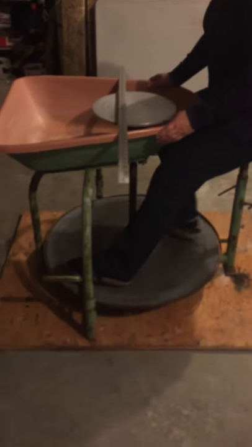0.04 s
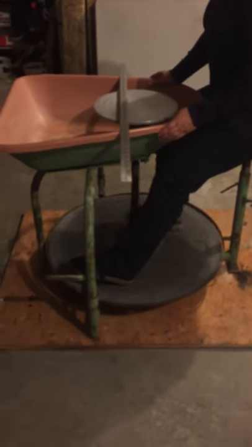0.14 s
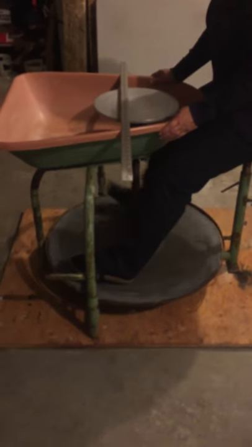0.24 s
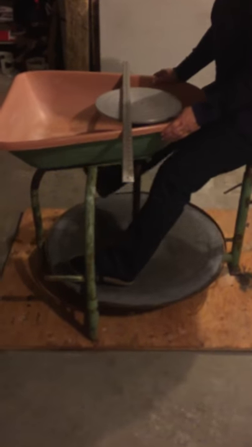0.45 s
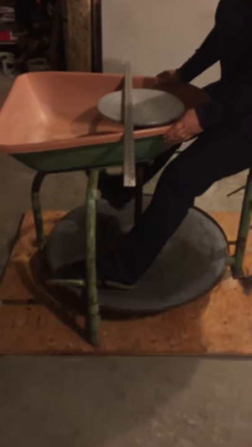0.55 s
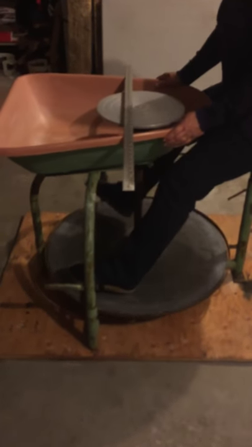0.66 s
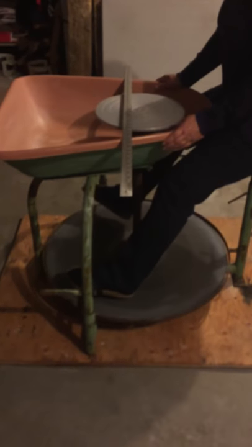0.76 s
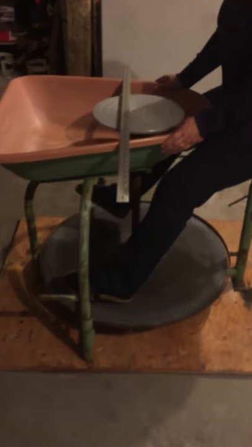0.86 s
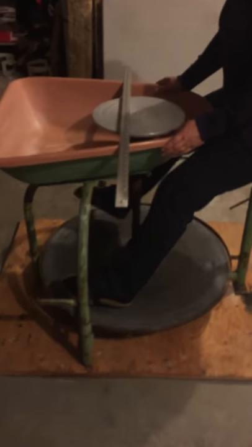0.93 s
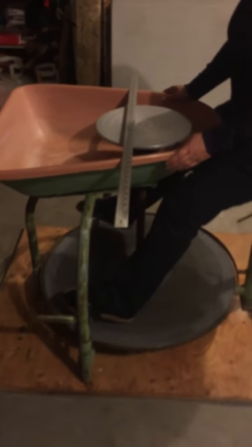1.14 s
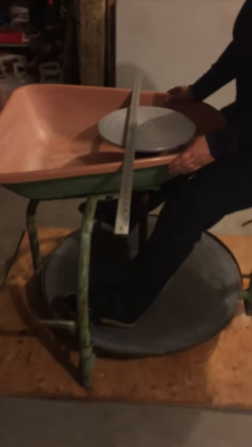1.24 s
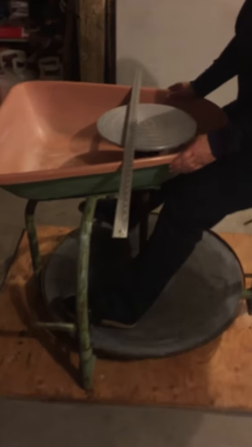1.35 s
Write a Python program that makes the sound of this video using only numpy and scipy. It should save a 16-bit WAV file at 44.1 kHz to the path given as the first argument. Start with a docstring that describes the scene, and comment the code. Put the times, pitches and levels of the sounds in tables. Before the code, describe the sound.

A foot kicks a potter's wheel with a scuff and a low, rattling thud.

```python
"""In a quiet workshop, a foot kicks the flywheel of a home-made potter's wheel.
The trouser leg swishes and the sole scrapes over the disc, both by friction. The foot lands with a
stuttering thud: a run of impacts that excites the modes of the frame and its tray and shakes loose parts.
The wheel rolls on with a faint rumble, a soft knock and a small rattling click.
The room answers the contacts with a short, dull reverberation."""
import sys
import numpy as np
from scipy import signal
from scipy.fft import rfft, irfft
from scipy.io import wavfile

SR = 44100
rng = np.random.default_rng(int(sys.argv[2]) if len(sys.argv) > 2 else 0)


def int16_out(signal):
    """Quantize to a 16-bit WAV file."""
    q = np.round(np.clip(np.atleast_2d(signal).T, -1, 1) * 32767)
    wavfile.write(sys.argv[1], SR, q.astype(np.int16))


N = 61739
TIME = np.arange(N) / SR
BIN_HZ = np.arange(N // 2 + 1) * SR / N
SHAKE_START_S, SHAKE_ATTACK_S, SHAKE_HOLD_S = 0.4265, 0.021, 0.026

# Pressure of the sliding sole. Each row: time in seconds, level in dB.
SOLE_PRESSURE = [(0.21, -79), (0.216, -52), (0.226, -44.5), (0.235, -36.5), (0.275, -39), (0.295, -42),
                 (0.311, -43), (0.33, -46.5), (0.374, -49.5), (0.388, -44), (0.42, -51.5), (0.44, -57),
                 (0.5, -96)]
# Modes of the wheel's steel parts. Each row: frequency in Hz, gain in dB, T60 in seconds.
STEEL_MODES = [(1037, 1, 0.24), (1165, -5, .2), (1781, 1, 0.68), (2222, 4, 0.21), (2380, -2, 0.073),
               (2488, -0.5, 0.11), (2779, 2, 0.29), (3086, -2, 0.13)]


def from_db(db):
    """Amplitude ratio of a level in decibels."""
    return 10 ** (np.asarray(db) / 20)


def unit_rms(x):
    """Normalisation to an RMS of one."""
    return x / np.sqrt(np.mean(x ** 2) + 1e-20)


def envelopes(rows):
    """Interpolation in dB over time: one gain curve for each level column."""
    times, *columns = np.transpose(rows)
    return [from_db(np.interp(TIME, times, levels)) for levels in columns]


def at_hz(points, hz):
    """Interpolation on a logarithmic frequency axis."""
    frequencies, values = np.transpose(points)
    return np.interp(np.log(np.maximum(hz, 1)), np.log(frequencies), values)


def colour(x, spectrum):
    """Spectral shaping by (Hz, dB) points, at unit RMS."""
    return unit_rms(irfft(rfft(x) * from_db(at_hz(spectrum, BIN_HZ)), N))


def noise(spectrum):
    """Stationary Gaussian noise with the given spectral shape."""
    return colour(rng.standard_normal(N), spectrum)


def butter(x, hz, kind="low"):
    """Causal Butterworth filtering with gentle slopes."""
    sections = signal.butter(2, np.clip(hz, 10, SR / 2 - 500), kind, fs=SR, output="sos")
    return signal.sosfilt(sections, x + 1e-18)


def decay(start, t60):
    """Exponential decay: 60 dB in t60 seconds."""
    return (TIME >= start) * from_db(-60 * np.maximum(TIME - start, 0) / t60)


def swell(peak_s, width_s):
    """Gaussian rise and fall."""
    return np.exp(-.5 * ((TIME - peak_s) / width_s) ** 2)


def grains(per_second=3000, spread_db=2):
    """A Poisson process of tiny slips of uneven size."""
    sizes = from_db(spread_db * np.minimum(rng.exponential(1, N), 4)) * rng.choice([-1, 1], N)
    return sizes * (rng.random(N) < per_second / SR)


def impulses(rows):
    """Ideal impacts, one for each (seconds, dB) row."""
    out = np.zeros(N)
    for start, db in rows:
        out[int(start * SR)] += from_db(db)
    return out


def ring(force, modes):
    """Modal superposition: each (Hz, dB, T60 in seconds) mode is a driven, damped oscillator."""
    out = 0
    for hz, db, t60 in modes:
        radius, angle = from_db(-60 / (t60 * SR)), 2 * np.pi * hz / SR
        feedback = [1, -2 * radius * np.cos(angle), radius * radius]
        out = out + from_db(db) * signal.lfilter([0, np.sin(angle)], feedback, force + 1e-18)
    return out


def frame(force, radiation_hz=108):
    """Radiation efficiency: the frame and tray resonate, but give off little deep bass."""
    # Modes of frame and tray. Each row: frequency in Hz, gain in dB, T60 in seconds.
    frame_modes = [(133, -15.5, 0.067), (178.2, -16.5, 0.31), (224.3, -17.5, 0.15), (279.2, -19.5, 0.41),
                   (323.5, -0.5, 0.17), (337.4, -21, 1.27), (365.1, -12.5, 0.26), (420, -27, 0.092),
                   (475.5, -23, 0.28), (605, -21.5, .28), (660.6, -23, 0.46), (738.5, -29, 0.74),
                   (778, -37, 0.8), (844, -24, 0.69)]
    return butter(ring(force, frame_modes), radiation_hz, "high")


def room_tone():
    """The noise floor: steady low-pitched noise and a faint white hiss."""
    low = noise([(25, -26), (55, 3.5), (130, 5.5), (300, -5.5), (1000, -19), (8000, -49)])
    return from_db(-73.5) * low + from_db(-78) * rng.standard_normal(N)


def reverberation(x, cutoff_hz=2400):
    """A diffuse field: convolution with a dull, exponentially decaying noise."""
    tail = butter(rng.standard_normal(N), cutoff_hz) * decay(start=0.0091, t60=0.55)
    tail = tail / np.sqrt(np.sum(tail ** 2) * SR / 2 / cutoff_hz)  # about unit gain in the passband
    return from_db(-12) * signal.fftconvolve(x, tail)[:N]


def wheel():
    """Forced vibration: rolling rumbles and stirs the frame; shaft friction makes the steel sing."""
    # Rolling and rubbing. Each row: time in seconds, rumble level in dB, rub level in dB.
    roll_levels = [(0, -69, -71), (0.2, -80, -69.5), (0.6, -67, -72.5), (0.78, -66.5, -70.5),
                   (0.87, -61.5, -68.5), (1.0, -66.5, -65.5), (1.06, -67, -65), (1.095, -57.5, -66.5),
                   (1.13, -68.5, -64.5), (1.2, -62.5, -71), (1.3, -69.5, -73), (1.4, -64.5, -78)]
    # Spectra of the rolling wheel and its shaft. Each row: frequency in Hz, relative level in dB.
    rumble_spectrum = [(25, -24.5), (55, 0), (80, -18), (120, -1), (180, -3), (300, 1), (500, -13),
                       (780, -5.5), (1100, -39), (3000, -46)]
    rub_spectrum = [(400, 0), (1000, 5.5), (1900, 5.5), (3000, 0), (6000, -7.5), (9000, -12), (15000, -25)]
    # Swells of frame hum. Each row: peak time and width in seconds, frequency in Hz, level in dB.
    hum_swells = [(0.862, 0.017, 176.7, -53.5), (1.12, 0.06, 113.2, -63.5), (1.21, 0.032, 174.8, -62.5),
                  (1.22, 0.14, 742, -71)]
    rumble, rub = envelopes(roll_levels)
    hum = sum(from_db(db) * swell(peak, width) * np.sin(2 * np.pi * hz * TIME)
              for peak, width, hz, db in hum_swells)
    rolling_force = butter(rng.standard_normal(N), 700, "high")
    stirred = from_db(-8.5) * unit_rms(frame(rolling_force))
    singing = from_db(-9.5) * unit_rms(ring(rng.standard_normal(N), STEEL_MODES))
    return rumble * (noise(rumble_spectrum) + stirred) + rub * (noise(rub_spectrum) + singing) + hum


def scuff():
    """Brief friction in a narrow band: something brushes the turning wheel."""
    rasp = unit_rms(butter(grains(), [1590, 2170], "band"))
    return from_db(-64) * swell(peak_s=1.129, width_s=0.016) * rasp


def clicks():
    """A loose part rattles: its noise bursts add in power, and two of its modes ping."""
    # Impacts of the part. Each row: start in seconds, level in dB.
    ticks = [(1.3617, -47), (1.37, -58), (1.377, -53.5), (1.387, -54.5)]
    # Spectrum of the bursts. Each row: frequency in Hz, relative level in dB.
    tick_spectrum = [(300, -32), (750, 5.5), (1300, -7), (2200, 0.5), (2800, 2), (4100, -1), (5000, -21),
                     (15000, -40)]
    power = 0
    for start, db in ticks:
        burst = decay(start, t60=0.0072) + from_db(-5) * decay(start, t60=0.28)
        power = power + (from_db(db) * burst) ** 2
    ping = ring(impulses(ticks), modes=[(2730, 1, 0.069), (3420, -7, .05)])
    return .5 * np.sqrt(power) * noise(tick_spectrum) + from_db(-9) * ping


def knocks(cycles=3.36):
    """Heavy damping: each knock dies in a few cycles, leaving a clatter and a ring in the frame."""
    # Light knocks on the wheel. Each row: start in seconds, impulse level in dB, pitch in Hz.
    light_hits = [(0.2129, -26.5, 825), (1.0394, -39.5, 293)]
    # Spectrum of the clatter. Each row: frequency in Hz, relative level in dB.
    clatter_spectrum = [(60, -20.5), (130, -7), (400, 4), (700, -16), (1000, 2), (1400, -16), (2200, -8),
                        (4000, -22), (12000, -51)]
    out = 0
    for start, db, hz in light_hits:
        force = butter(impulses([(start, db)]), 3 * hz)
        clatter = from_db(db - 15) * noise(clatter_spectrum) * decay(start, t60=0.23)
        knock = ring(force, [(hz, 3, cycles / hz)]) + clatter + from_db(-17) * frame(force)
        out = out + butter(knock, 0.42 * hz, "high")
    return out


def trouser_leg():
    """Friction noise of cloth on cloth, in two bands that rise and fall separately."""
    # Swing of the leg. Each row: time in seconds, swish level in dB, top octave level in dB.
    cloth_levels = [(0, -85, -88), (0.05, -59, -64.5), (0.088, -71, -72), (0.124, -68.5, -73),
                    (0.17, -51.5, -58.5), (0.21, -48, -55.5), (0.26, -51.5, -65), (0.32, -56.5, -54),
                    (0.365, -62.5, -57), (0.42, -67, -71.5), (0.5, -78, -78), (0.6, -76, -87)]
    # Spectra of the swish and its top octave. Each row: frequency in Hz, relative level in dB.
    swish_spectrum = [(300, -12), (1200, -4), (2200, 2), (3500, 3), (5500, 4), (9000, -5), (15000, -25)]
    top_spectrum = [(3000, -25), (6500, -3), (9000, -2), (15000, -9.5)]
    swish, top = envelopes(cloth_levels)
    return swish * noise(swish_spectrum) + top * noise(top_spectrum)


def steel():
    """Resonance: grit under the sole and the chatter of loose parts excite the steel's modes."""
    slips = grains()
    pressure, = envelopes(SOLE_PRESSURE)
    shaking = swell(SHAKE_START_S + SHAKE_ATTACK_S, SHAKE_HOLD_S)
    strength = from_db(-13) * pressure + from_db(-50.5) * shaking
    return ring(slips * strength, STEEL_MODES) / np.std(ring(slips, STEEL_MODES))


def loose_parts():
    """Frequency-dependent damping: parts chatter with the thud, and the high treble dies first."""
    # Spectrum of the chatter. Each row: frequency in Hz, relative level in dB.
    chatter_spectrum = [(70, -13), (180, 7), (450, 11.5), (800, 5.5), (1300, -2), (2000, 1.5), (2900, -6.5),
                        (4500, -16.5), (6500, -24.5), (10000, -37), (15000, -49)]
    # Decay of the chatter. Each row: frequency in Hz, T60 in seconds.
    decay_times = [(100, 0.3), (400, 0.24), (900, 0.46), (2500, 0.29), (5000, 0.24), (12000, 0.14)]
    edges_hz = 70 * 2 ** np.arange(0, 8.1, .5)  # half-octave bands
    chatter_bins = rfft(colour(grains(), chatter_spectrum))
    attack = np.clip((TIME - SHAKE_START_S) / SHAKE_ATTACK_S, 0, 1)
    age = np.maximum(TIME - SHAKE_START_S - SHAKE_ATTACK_S - SHAKE_HOLD_S, 0)
    out = 0
    for low, high in zip(edges_hz, edges_hz[1:]):
        band = irfft(chatter_bins * ((BIN_HZ >= low) & (BIN_HZ < high)), N)
        t60 = at_hz(decay_times, np.sqrt(low * high))
        out = out + band * from_db(-60 * age / t60)
    return from_db(-39.5) * out * attack


def scrape(sway_s=.297, sway_hz=47.5):
    """Sliding friction: grit under the sole rasps and drives the frame; the push sways the floor."""
    # Spectrum of the rasp. Each row: frequency in Hz, relative level in dB.
    rasp_spectrum = [(100, -28), (200, -7), (300, 10.5), (700, 7.5), (1400, 3.5), (2400, 1.5), (4000, -6),
                     (7000, -29), (15000, -28.5)]
    pressure, = envelopes(SOLE_PRESSURE)
    slips = grains()
    drag = butter(slips, 230, "high")
    ringing = frame(drag * pressure) / np.std(frame(drag))
    sway = np.sin(2 * np.pi * sway_hz * (TIME - sway_s)) * swell(sway_s, width_s=0.027)
    return pressure * colour(slips, rasp_spectrum) + from_db(2) * ringing + from_db(-50.5) * sway


def grip():
    """Slip turns to stick: grit crunches and the sole chirps as it stops sliding."""
    # Spectrum of the crunching grit. Each row: frequency in Hz, relative level in dB.
    crunch_spectrum = [(500, -14), (2500, 3.5), (4500, -2), (6000, -13.5), (15000, -26)]
    chirp_band = unit_rms(butter(rng.standard_normal(N), [7750, 8490], "band"))
    chirp = chirp_band * swell(peak_s=.463, width_s=0.0036)
    crunch = colour(grains(), crunch_spectrum) * decay(start=.429, t60=0.094)
    return from_db(-57.5) * chirp + from_db(-45.5) * crunch


def waver(start, onset_s=0.27, rate_hz=44.5, depth_db=2.5):
    """Random amplitude modulation: a gain whose flutter grows from the start time."""
    flutter = noise([(5, -10), (rate_hz, 0), (3 * rate_hz, -30), (20 * rate_hz, -90)])
    return from_db(depth_db * flutter * np.clip((TIME - start) / onset_s, 0, 1))


def thud():
    """Soft impact: band-limited pulses from the sole excite the frame, whose ring wavers in level."""
    # Contacts of the foot. Each row: start in seconds, impulse level in dB, low and high cutoff in Hz.
    landings = [(0.4387, -21.5, 103, 560), (0.4510, -22.5, 131, 480), (0.4604, -27, 130, 800),
                (0.4744, -27.5, 168, 494), (0.4825, -24.5, 208, 550), (0.4910, -28.5, 262, 500)]
    force = 0
    for start, db, low, high in landings:
        pulse = butter(impulses([(start, db)]), high)
        force = force + butter(pulse, low, "high")
    return frame(force) * waver(start=landings[0][0])


def scene():
    """Superposition of kick, wheel and room tone; the thud and the other contacts reverberate."""
    contacts = loose_parts() + scrape() + steel() + grip() + knocks() + clicks()
    background = room_tone()
    blow = thud()
    room = reverberation(contacts + from_db(2) * blow)
    return (blow + contacts + room + trouser_leg() + wheel() + scuff() + background)[None]


def record(dry, cutoff_hz=15750):
    """Band limiting: a steep elliptic low-pass removes the highest treble."""
    return signal.sosfilt(signal.ellip(12, .1, 80, cutoff_hz, fs=SR, output="sos"), dry)


dry = scene()
out = record(dry)
int16_out(out)
```